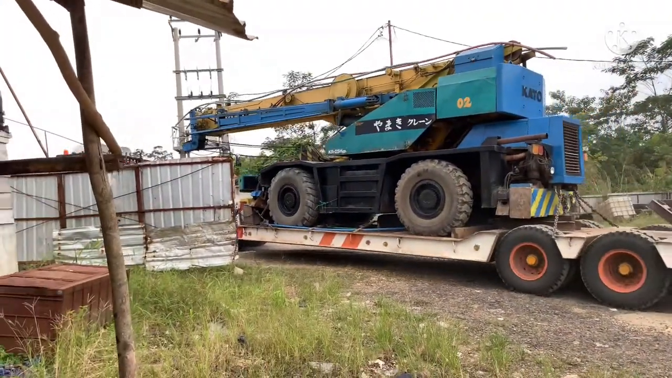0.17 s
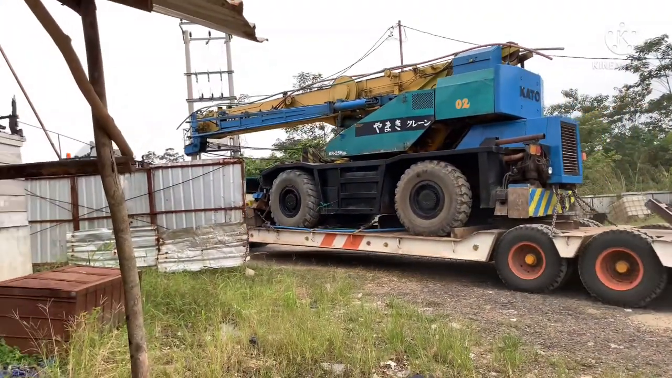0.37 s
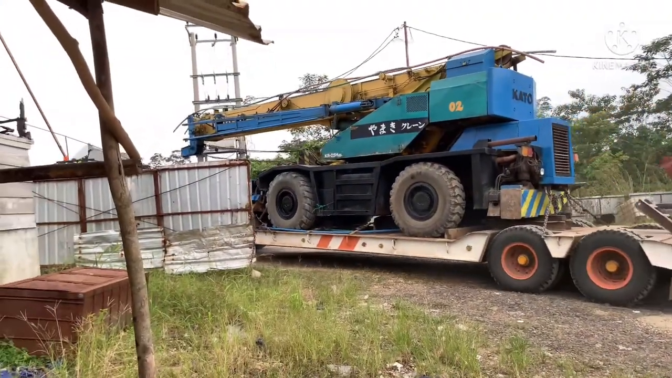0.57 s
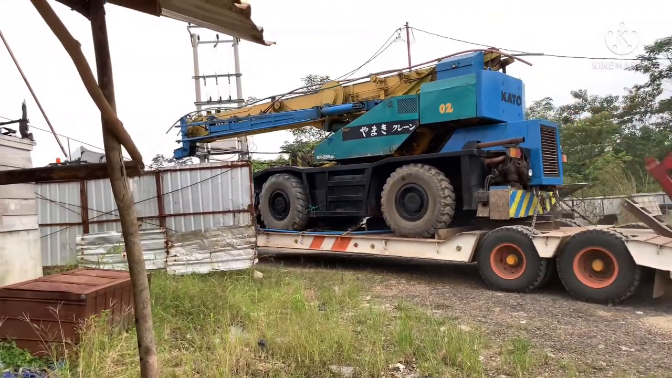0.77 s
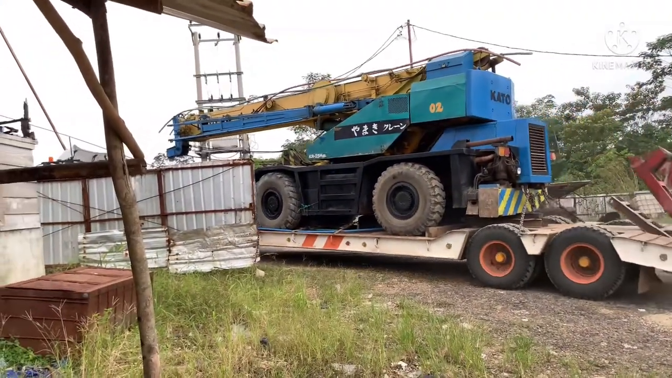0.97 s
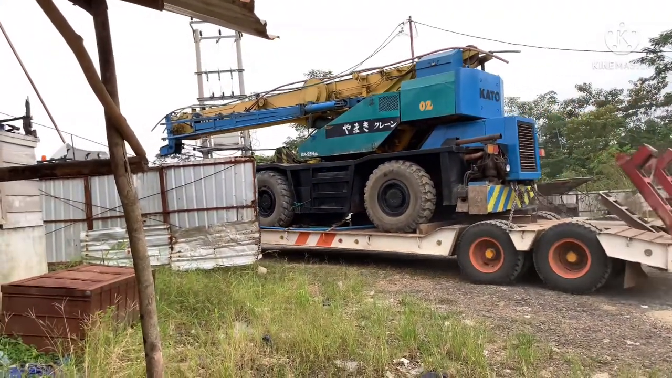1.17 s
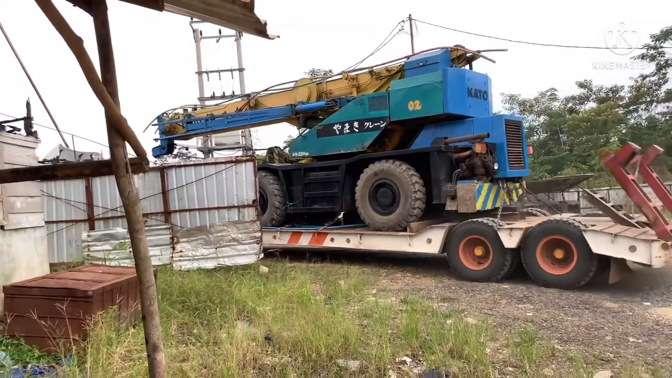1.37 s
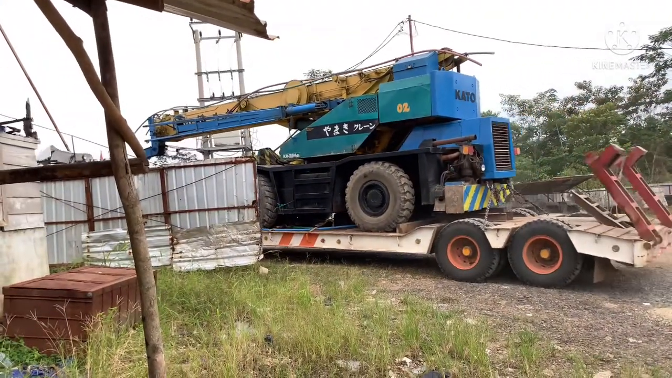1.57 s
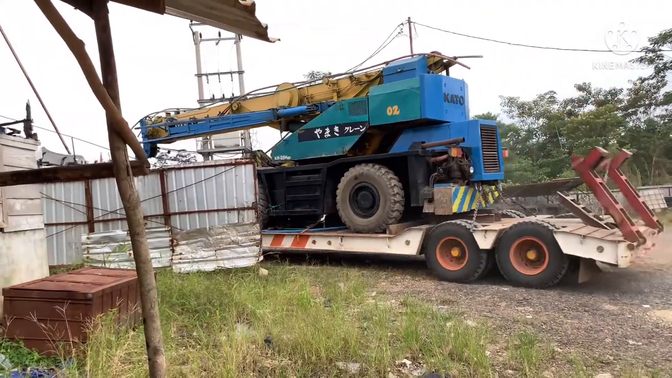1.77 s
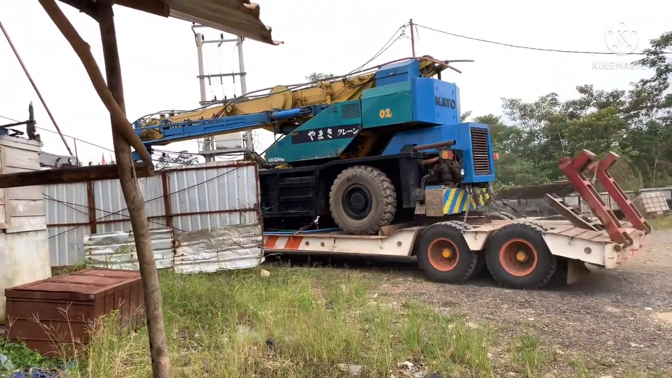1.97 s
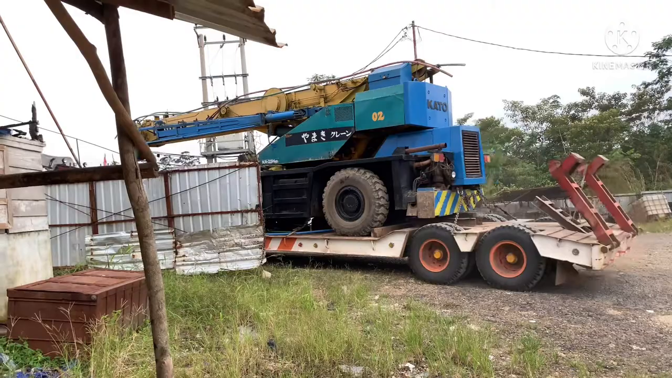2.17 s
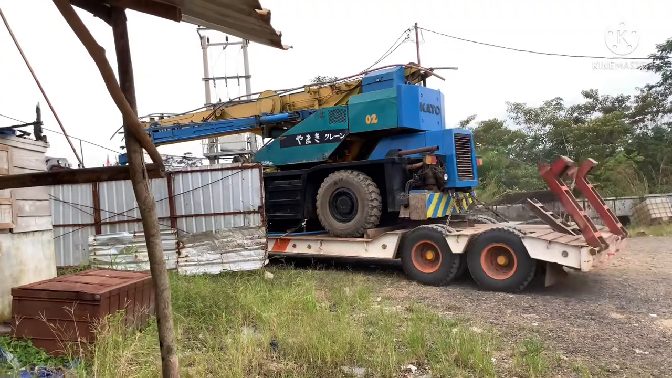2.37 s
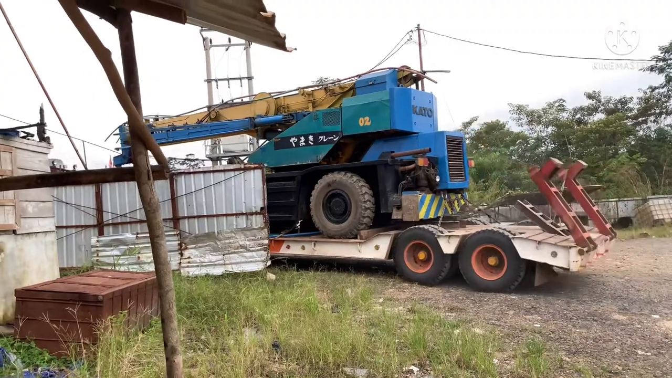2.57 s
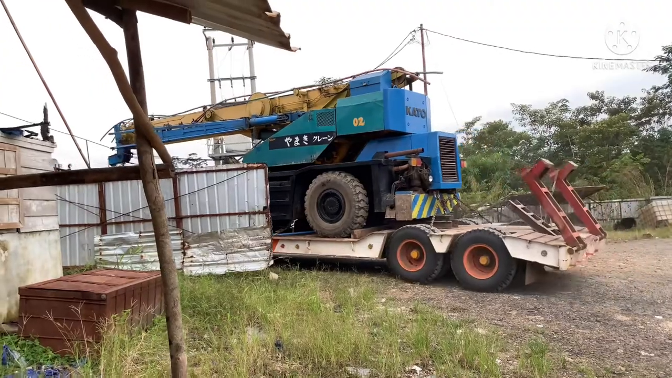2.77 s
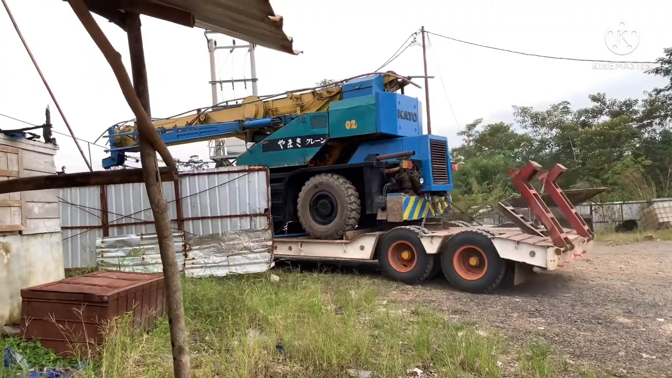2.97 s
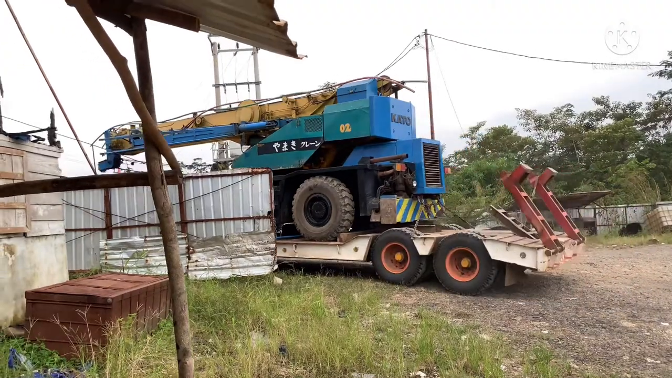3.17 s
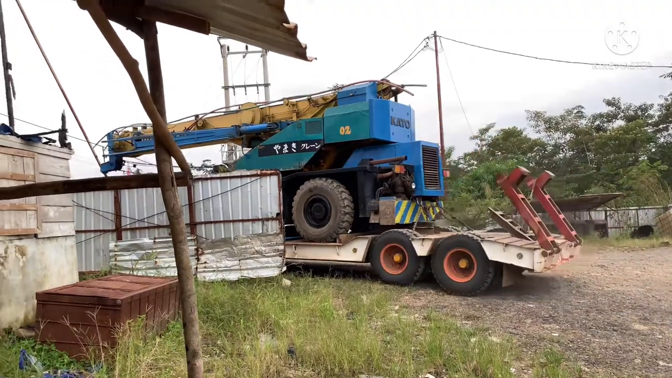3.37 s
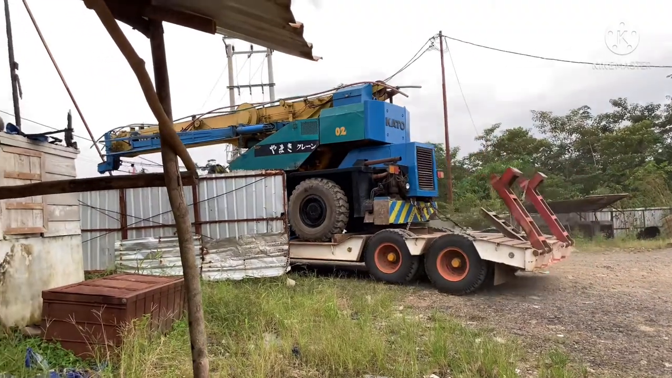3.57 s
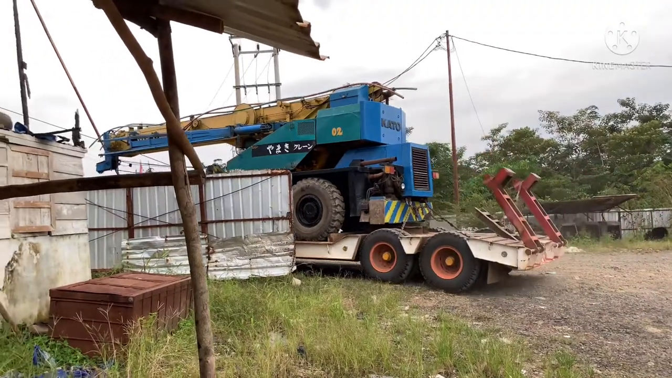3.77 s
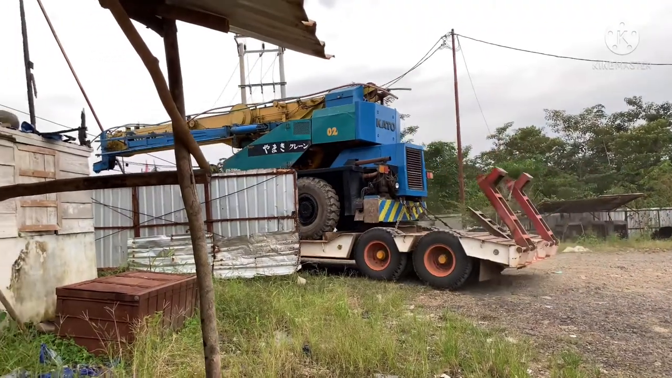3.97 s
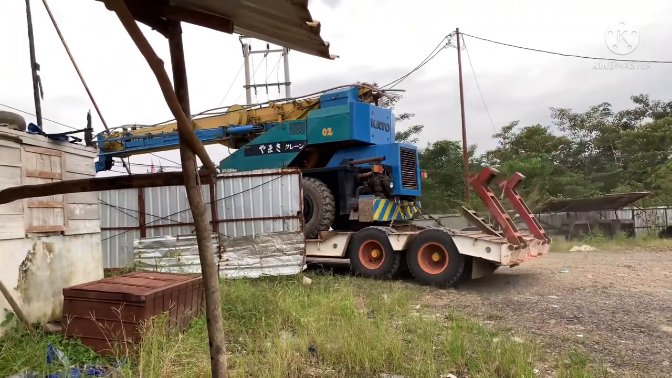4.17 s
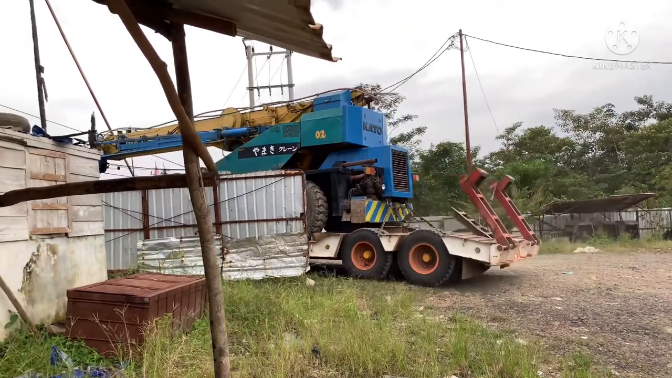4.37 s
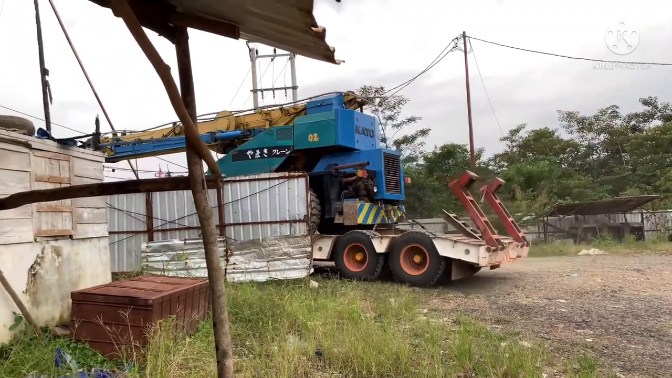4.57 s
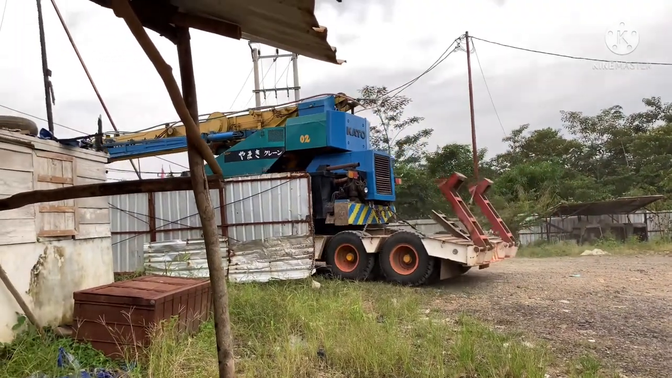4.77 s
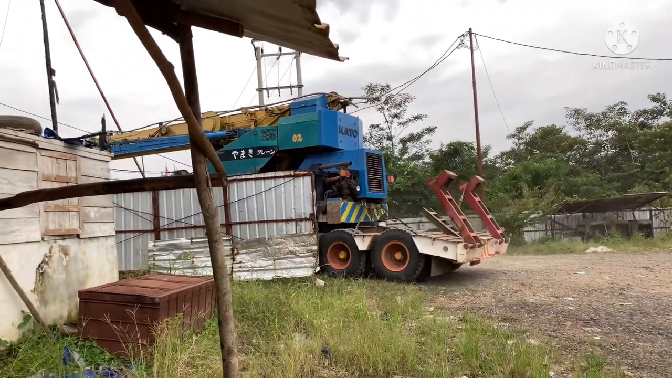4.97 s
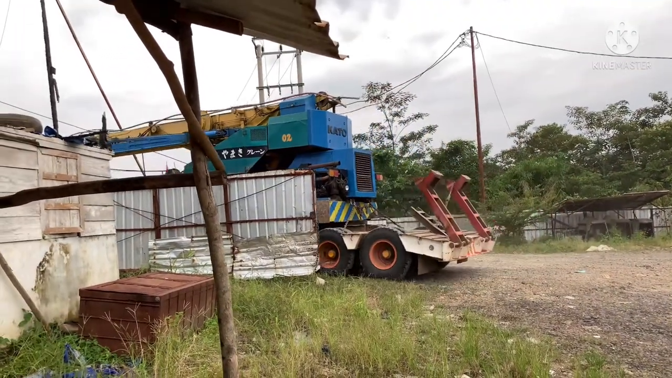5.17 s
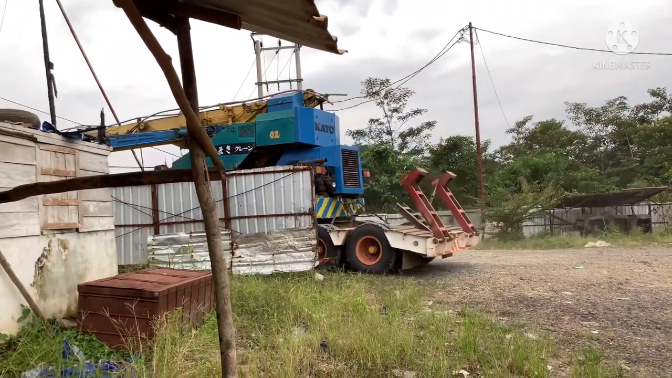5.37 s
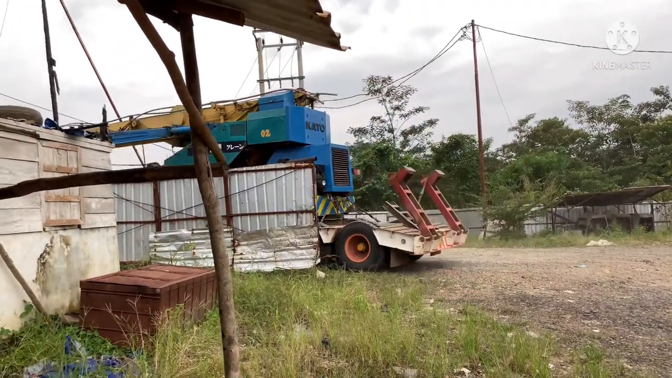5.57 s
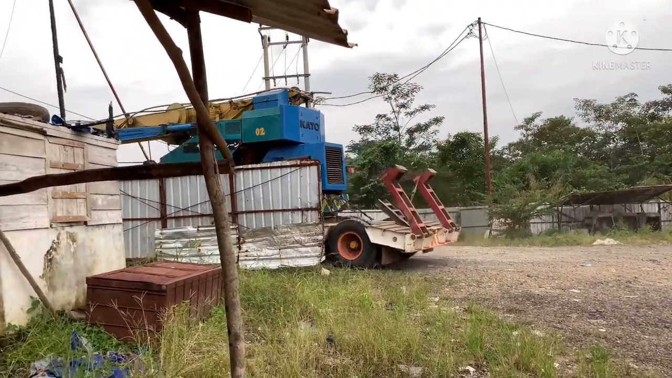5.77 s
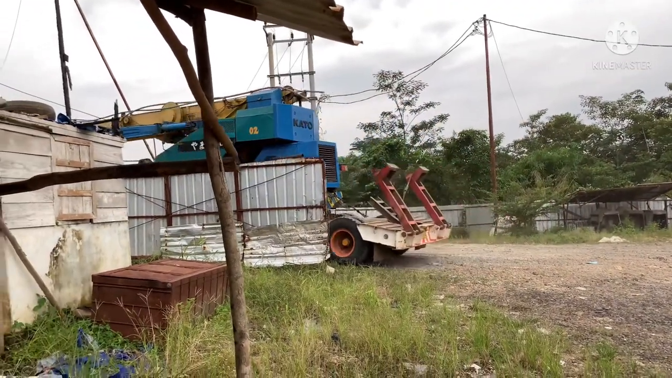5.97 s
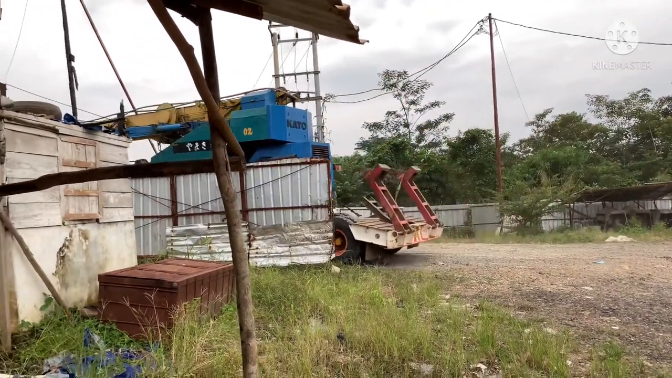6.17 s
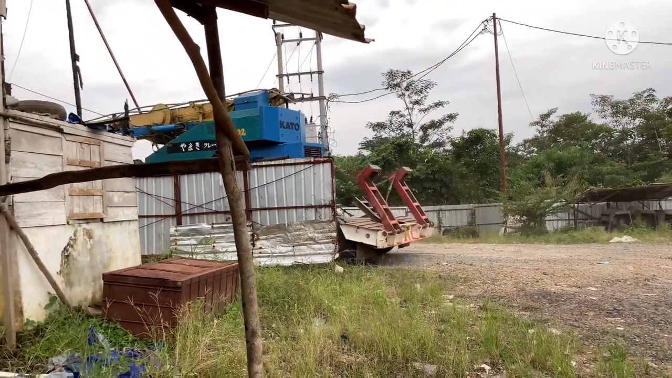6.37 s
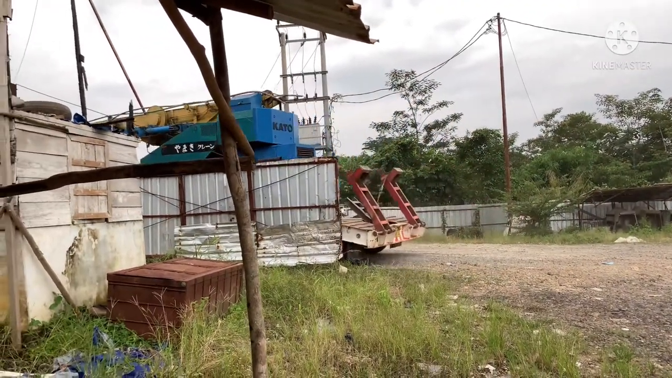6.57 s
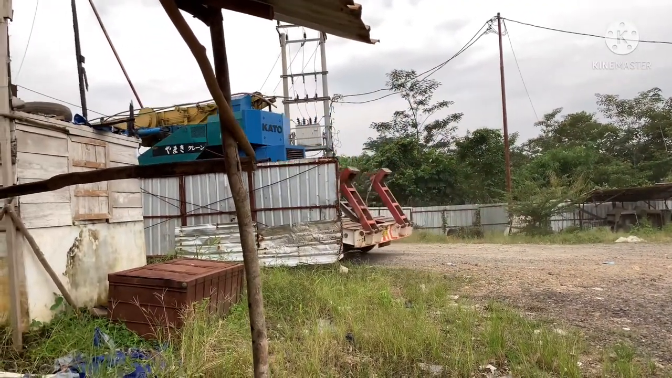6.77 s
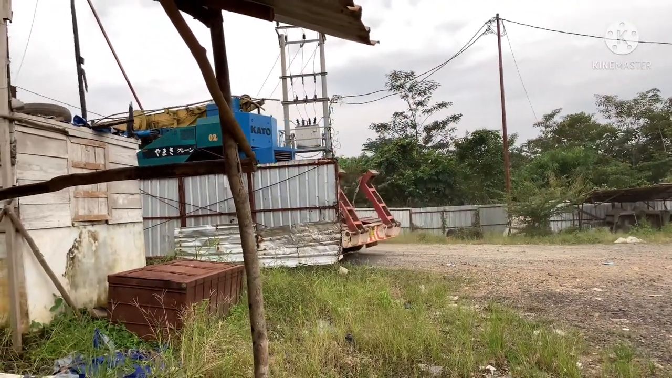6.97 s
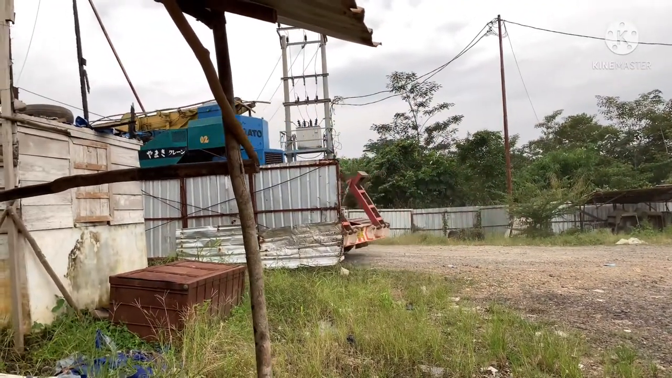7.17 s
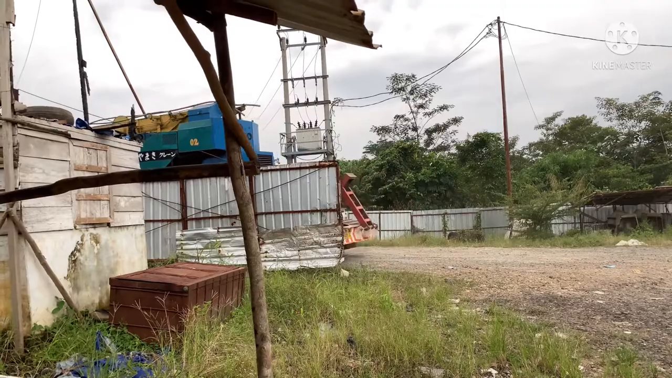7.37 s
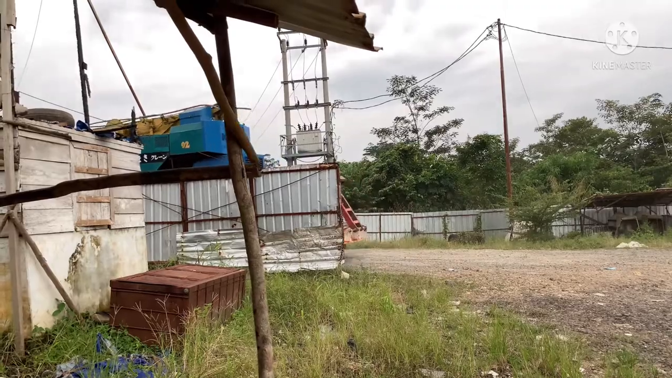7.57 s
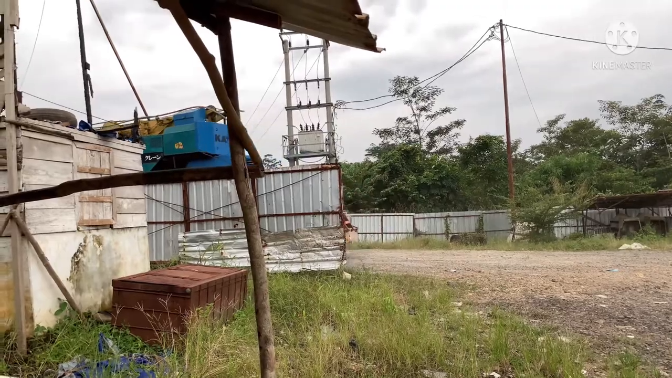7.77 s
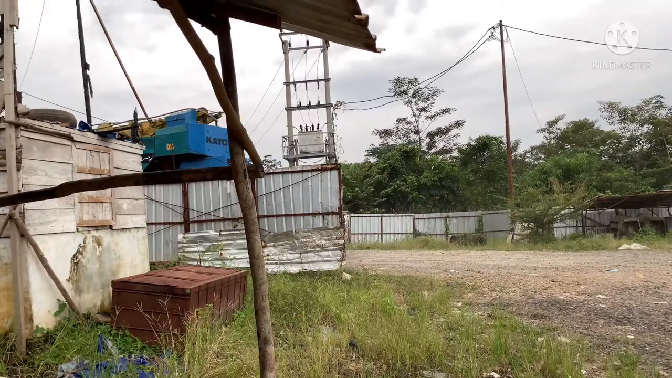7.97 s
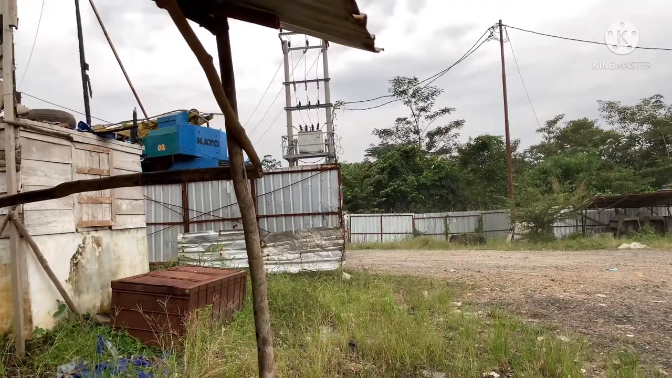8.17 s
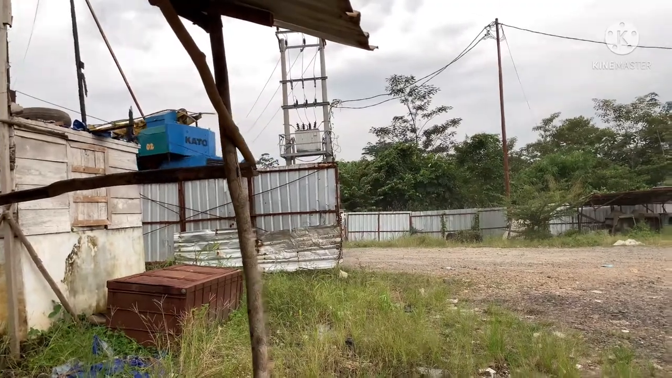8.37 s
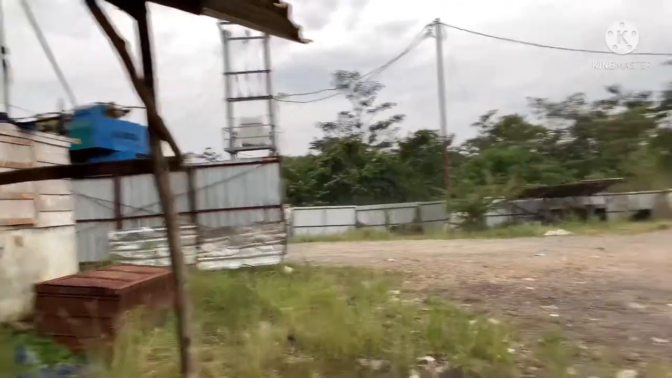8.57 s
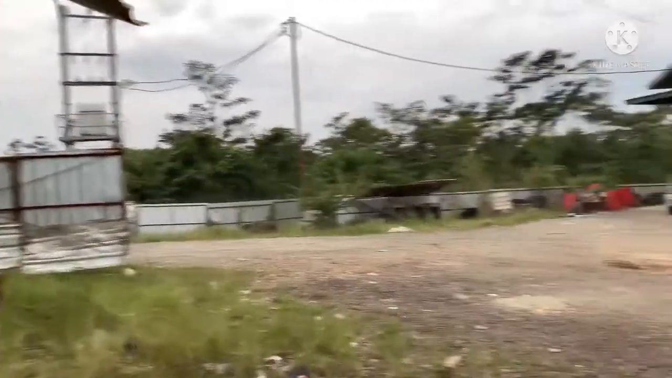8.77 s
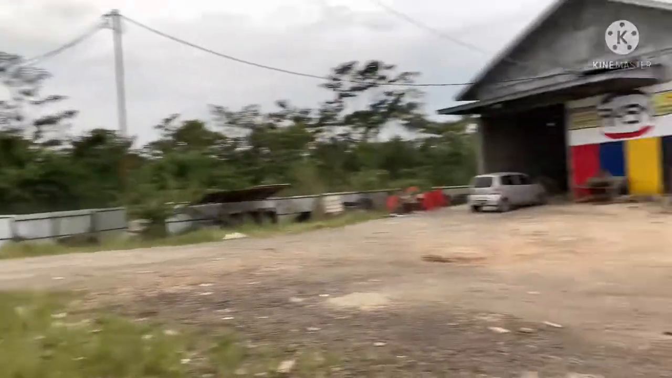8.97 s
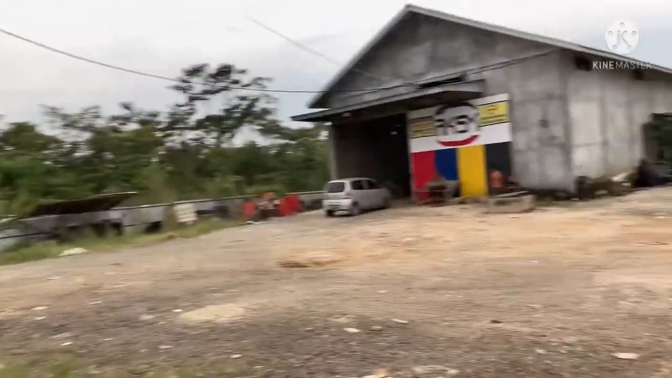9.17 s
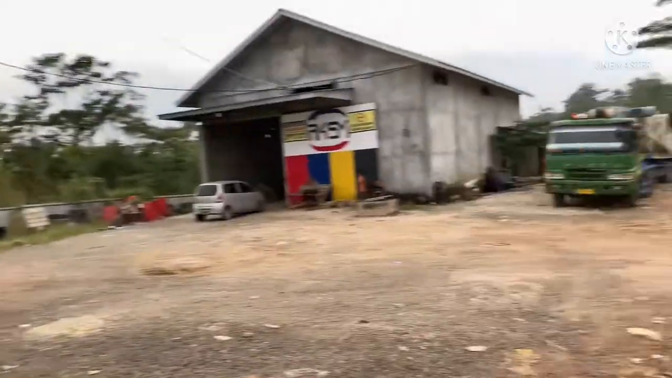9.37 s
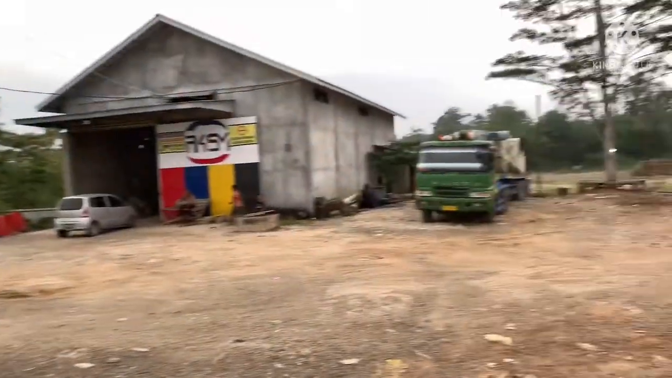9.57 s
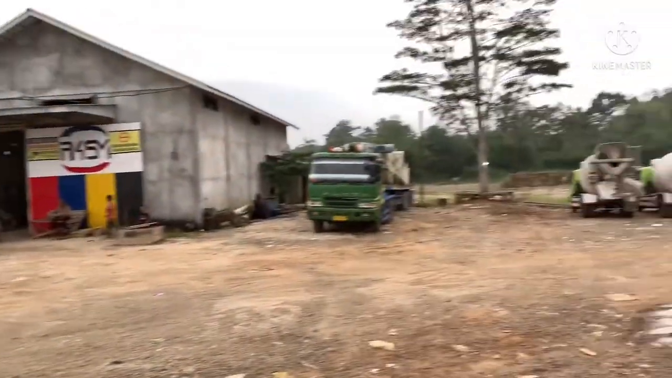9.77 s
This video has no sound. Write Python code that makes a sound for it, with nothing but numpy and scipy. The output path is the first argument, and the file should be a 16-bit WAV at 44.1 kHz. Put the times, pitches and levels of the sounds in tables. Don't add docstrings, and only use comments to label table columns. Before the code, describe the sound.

A handheld stereo phone in an open gravel yard hears a heavy diesel truck close by, pulling a loaded low trailer. From 0 s a low, uneven firing drone, tailpipe roar, block and valve clatter, fan hiss, loose chain rattle and rolling tyre rumble are at their loudest. Link strikes and clanks come at 0-0.2 s, frame jolts at 0.5 and 1.1-1.3, and the hardest deep thud with rebounds at 1.9-2.0. The engine pitch sags until about 2.5, then climbs to 7 as clanks and dry stone ticks continue sparsely. From 4.8 the truck turns a corner and steadily fades, its drone dipping at moments. A faint bump falls at 6.0; a short stick-slip groan with echo at 7.3. Behind the fence it grows distant. Near 8.9 the phone swings, bringing a slight whistle, then a faint parked truck's throb and whine with tiny clanks until 9.8.

```python
import sys
import numpy as np
from scipy import signal
from scipy.fft import rfft, irfft, next_fast_len
from scipy.io import wavfile
from scipy.ndimage import uniform_filter1d, map_coordinates

SR = 44100
rng = np.random.default_rng(int(sys.argv[2]) if len(sys.argv) > 2 else 0)


def pcm_store(signal):
    levels = np.round(np.clip(np.atleast_2d(signal), -1, 1) * 32767)
    wavfile.write(sys.argv[1], SR, levels.astype(np.int16).T)


def convert_level_to_amplitude(level_db):
    exponent = np.asarray(level_db, float) / 20
    return 10 ** exponent


N = 433062
COMMON = np.array([[1], [0]])


def unit(x):
    return x / np.sqrt(np.mean(x ** 2) + 1e-20)


def peak(x):
    return x / np.abs(x).max()


def along(points, hz):
    f, v = np.transpose(points)
    return np.interp(np.log(hz + 1), np.log(f + 1), v)


def curves(rows):
    s, *cols = np.transpose(rows)
    return [np.interp(np.arange(N) / SR, s, c) for c in cols]


def wobble(rate):
    knots = rng.standard_normal(int(N * rate / SR) + 4)
    return map_coordinates(knots, [np.arange(N) * rate / SR])


def step(s, takes_s):
    return .5 + .5 * np.tanh((np.arange(N) / SR - s) / takes_s)


def swell(s, takes_s):
    return np.exp(-((np.arange(N) / SR - s) / takes_s) ** 2)


def filtered(x, response):
    m = next_fast_len(N + SR // 4)
    return irfft(rfft(x, m) * response(np.fft.rfftfreq(m, 1 / SR)), m)[..., :N]


def resonant(modes):
    def response(f):
        total = 0
        for k, (centre, width, db) in enumerate(modes):
            damping = 1j * f * width
            total = total + (-1) ** k * convert_level_to_amplitude(db) * damping / (centre * centre - f * f + damping)
        return total
    return response


def resonated(x, modes):
    return unit(filtered(filtered(x, resonant(modes)), resonant(modes)))


def rings(modes):
    return resonated(rng.standard_normal((2, N)), modes)


def plain(spectrum):
    return unit(filtered(rng.standard_normal((2, N)), lambda hz: convert_level_to_amplitude(along(spectrum, hz))))


def rush(spectrum, patchy_db, streak_db=1.0, gate=1):
    pair = gate * rng.standard_normal((2, N))
    for length, high, long, depth_db in ((512, 5, 8, patchy_db), (2048, 2, 10, streak_db)):
        z = signal.stft(pair, nperseg=length)[2]
        field = uniform_filter1d(rng.standard_normal(z.shape[1:]), size=high, axis=0)
        field = uniform_filter1d(field, size=long, axis=1)
        pair = signal.istft(z * convert_level_to_amplitude(depth_db * unit(field)), nperseg=length)[1][:, :N]
    return unit(filtered(pair, lambda hz: convert_level_to_amplitude(along(spectrum, hz))))


def add(out, s, sound):
    start = round(s * SR)
    out[..., start:start + sound.shape[-1]] += sound


# time in seconds, gain in dB.
DISTANCE = [(0, 1.5), (.45, -0.5), (1.5, -2), (2.2, -2.5), (2.57, -1), (3.0, -2.5), (4.1, -3), (5, -5),
            (5.6, -6.5), (6.12, -5.5), (6.4, -7), (7, -9), (7.7, -10), (8.3, -11.5), (9.82, -12.5)]
# near level in dB, share of the distance loss,
# change at the corner in dB, change behind the fence in dB, change as the phone swings in dB.
LAYERS = [(-29, 0.48, 0.3, -1.5, -5), (-31, 1.038, 0.1, -1.5, -1), (-40.5, 1.215, -0.3, 3.5, 2.5),
          (-51, 1.57, -0.2, -4.5, 2.5), (-37, 0.67, -2, 3, -3)]
CORNER_S, CORNER_TAKES_S = 4.8, 0.09
FENCE_S, FENCE_TAKES_S = 7.13, 0.5
SWING_S, SWING_TAKES_S = 8.93, 0.2


def heard():
    causes = [curves(DISTANCE)[0], step(CORNER_S, CORNER_TAKES_S),
              step(FENCE_S, FENCE_TAKES_S), step(SWING_S, SWING_TAKES_S)]
    return [near_db + np.dot(effects, causes) for near_db, *effects in LAYERS]


# frequency in Hz, density in dB per Hz.
YARD = [(20, -40), (36, -19), (50, 2), (58, 11), (70, -40), (90, -120)]


def yard():
    return convert_level_to_amplitude(-47.5) * plain(YARD)


IDLE_FROM_S, THROB_DB = 7.4, -49
WHINE_DB, WHINE_AHEAD_DB = -57.5, 13.5
WHISTLE_S, WHISTLE_TAKES_S, WHISTLE_DB, WHISTLE_SWELL_DB = 8.82, 0.39, -67.5, 15


def parked():
    t = np.arange(N) / SR
    fade = np.clip(t - IDLE_FROM_S, 0, 1) ** 2
    throb = np.sqrt(2) * np.sin(2 * np.pi * 60.5 * t + 0.75 * wobble(2.7)) * COMMON
    whine = rings([(475.6, 120, -0.52), (1200, 104, -0.3), (1336, 43, 1.7), (1450, 54, -1)])
    whistle = rings([(2356, 137, 0.99), (2530, 160, -1), (2730, 230, -2)])
    whine_db = WHINE_DB + WHINE_AHEAD_DB * step(SWING_S + .12, SWING_TAKES_S)
    whistle_db = WHISTLE_DB + WHISTLE_SWELL_DB * swell(WHISTLE_S, WHISTLE_TAKES_S)
    return fade * (convert_level_to_amplitude(whine_db) * whine + convert_level_to_amplitude(THROB_DB) * throb + convert_level_to_amplitude(whistle_db) * whistle)


# frequency in Hz, density in dB per Hz.
TYRES = [(20, -50), (40, -29), (52, -9), (80, -6.5), (130, -3), (165, -8), (220, -66), (300, -120)]


def tyres():
    return convert_level_to_amplitude(heard()[4] + 6.0 + 0.51 * wobble(1.385)) * plain(TYRES)


# start in seconds, peak in dB, centre in Hz.
TICKS = [(0.3292, -34, 11400), (0.423, -34, 10700), (1.7625, -32, 9600), (2.785, -35, 10240),
         (2.81, -24, 15000), (3.4406, -32, 11200), (4.6941, -39, 11300), (5.369, -33, 11300),
         (5.8384, -44, 11000), (5.863, -39, 10200), (5.8715, -39, 10230), (5.9, -35, 11000),
         (5.9044, -41, 10500), (5.9267, -38, 11300), (6.6427, -46, 14650), (6.766, -47, 10350)]
TICK_T60_S = .0055


def stones():
    out, t = np.zeros((2, N + SR)), np.arange(SR // 4) / SR
    for s, db, hz in TICKS:
        noise = rng.standard_normal((2, len(t))) * [[1], [.3]]
        grit = signal.lfilter(*signal.iirpeak(hz, 1.5, SR), noise)
        add(out, s + 0.0014, convert_level_to_amplitude(db + 5.5) * peak(convert_level_to_amplitude(-60 * t / TICK_T60_S) * grit))
    return out[:, :N]


# start in seconds, peak in dB, ring in Hz.
BUMPS = [
    (0.48, -15, 463),
    (1.13, -17, 226),
    (1.249, -15.5, 207),
    (1.298, -14, 167.3),
    (1.942, -8.5, 129),
    (1.945, -18, 330),
    (1.971, -13.5, 132),
    (2.02, -15, 169.5),
    (5.979, -17.5, 251.9),
    (6.049, -22, 260),
]
# start in seconds, peak in dB, ring in Hz.
CLANKS = [(0.0184, -17.5, 2360), (0.094, -22, 2300), (0.179, -20.5, 2630), (1.0184, -23, 2380),
          (1.331, -25, 2340), (1.9381, -20.5, 2150), (1.965, -24, 2250), (1.98, -31, 2300),
          (2.3445, -17.5, 1590), (2.4684, -26, 2350), (2.578, -20.5, 1541), (2.586, -20, 2317),
          (2.562, -27, 3000), (2.5994, -23, 3200), (3.1557, -23, 1570), (3.9052, -25, 1710),
          (5.369, -21.5, 797), (6.8237, -34, 2325), (8.8995, -34, 2399), (9.3488, -31, 1567),
          (9.3621, -33, 1620), (9.3721, -29, 1670)]
# start in seconds, peak in dB, ring in Hz, 60 dB decay in seconds.
SURGES = [(.5, -21, 162, .35), (9.74, -41, 1340, .4), (2.3, -22, 209.5, .4), (2.95, -21.5, 684, .2),
          (3.1, -23.5, 650, .3), (5.12, -28.5, 380, 0.44), (5.22, -25, 601, .2), (6.2, -28, 350, 0.28),
          (7.515, -30, 740, 0.096), (8.55, -31, 515, 0.24), (8.62, -33, 674, 0.26), (9.68, -40, 1357, 0.37)]
# start in seconds, ring in Hz, peak in dB, 60 dB decay in seconds.
PINGS = [
    (2.8115, 14900, -27, .008),
    (0.1907, 2550, -13.5, 0.01),
    (.1905, 3600, -15, 0.0058),
    (1.907, 700, -20, 0.019),
    (1.936, 4500, -35, 0.068),
    (2.586, 3940, -27, .02),
    (4.667, 910, -31, 0.015),
    (5.369, 4160, -33, 0.02),
    (5.369, 11600, -36, .012),
    (8.68, 2740, -34, .03),
]
BUMP_T60_S, CLANK_T60_S = .16, .03


def trailer():
    out, t = np.zeros((2, N + SR)), np.arange(SR // 4) / SR
    bumps = [(*row, BUMP_T60_S) for row in BUMPS]
    clanks = [(*row, CLANK_T60_S) for row in CLANKS]
    # rows, rise in s, sharpness (Q), gain in dB
    for rows, rise, sharp, gain_db in ((bumps, .006, 4, -1.5), (SURGES, .015, 5, 1.5), (clanks, .0015, 3, -2.5)):
        for s, db, hz, t60 in rows:
            ring = signal.lfilter(*signal.iirpeak(hz, sharp, SR), rng.standard_normal((2, len(t))))
            envelope = convert_level_to_amplitude(-60 * t / t60) * (1 - np.exp(-t / rise))
            add(out, s, convert_level_to_amplitude(db + gain_db) * peak(envelope * ring))
    for s, hz, db, t60 in PINGS:
        envelope = convert_level_to_amplitude(db - 60 * t / t60) * (1 - np.exp(-t / 0.00024))
        add(out[0], s, envelope * np.sin(2 * np.pi * hz * t))
    return out[:, :N]


def rattle(count, centre_hz, spread, cycles):
    draw, t = rng.random((count, 4)), np.arange(SR // 50) / SR
    hz = centre_hz * np.exp(spread * (2 * draw[:, 1:2] - 1))
    size = convert_level_to_amplitude(-2.5 * np.log(draw[:, 2:3] + .02)) * centre_hz / hz
    envelope = np.exp(-t * hz / cycles) * (1 - np.exp(-t * hz))
    hits = size * np.sin(2 * np.pi * hz * t) * envelope
    row_start = (N + SR) * (draw[:, 3:] > .5)
    where = (draw[:, :1] * N).astype(int) + np.arange(len(t)) + row_start
    return unit(np.bincount(where.ravel(), hits.ravel(), 2 * (N + SR)).reshape(2, -1)[:, :N])


# frequency in Hz, width in Hz, level in dB.
BEAM = [
    (234, 49, -0.5),
    (640, 146, -2.5),
    (836, 120, -2),
    (1060, 102, -6),
]
# frequency in Hz, width in Hz, level in dB.
OVERTONE = [
    (1326, 120, 2),
    (1590, 150, 0.5),
    (2200, 180, -8),
]
GROAN_S, ATTACK_S, HOLD_S, RELEASE_DB_PER_S = 7.274, .014, .115, 280
LOCK_S, LOCK_TAKES_S, LOCK_DB, CLEAR = 7.33, .01, 2.5, .58
GROAN_DB, OVERTONE_DB, OVERTONE_LOCK_DB, SCRAPE_DB = -28.5, -41, 4, -54
CHATTER_HZ, CHATTER = 216.6, 0.4


def groan():
    t, lock = np.arange(N) / SR - GROAN_S, step(LOCK_S, LOCK_TAKES_S)
    release = convert_level_to_amplitude(-RELEASE_DB_PER_S * np.clip(t - ATTACK_S - HOLD_S, 0, 1))
    shape = np.clip(t / ATTACK_S, 0, 1) ** 2 * release
    slips = np.diff(np.floor(CHATTER_HZ * (t + GROAN_S)), prepend=0)
    chatter = slips * np.sqrt(SR / CHATTER_HZ) * COMMON
    friction = rng.standard_normal((2, N)) * convert_level_to_amplitude(1.1 * wobble(74))
    share = CHATTER * (1 - lock)
    force = share * chatter + (1 - share) * friction
    beam, over = resonated(force, BEAM), resonated(force, OVERTONE)
    phase = 2 * np.pi * 722 * t + 0.84 * wobble(40)
    tone = np.sqrt(2) * np.sin(phase) * convert_level_to_amplitude(1.8 * wobble(50))
    octave = np.sqrt(2) * np.sin(2 * phase) * convert_level_to_amplitude(1.8 * wobble(50))
    clear = CLEAR * lock
    low = convert_level_to_amplitude(GROAN_DB + LOCK_DB * lock) * ((1 - clear) * beam + clear * tone)
    high = convert_level_to_amplitude(OVERTONE_DB + OVERTONE_LOCK_DB * lock) * ((1 - clear) * over + clear * octave)
    near = shape * (low + high)
    echo = convert_level_to_amplitude(-16) * np.roll(near, round(.175 * SR), axis=1) + convert_level_to_amplitude(-10) * np.roll(near, round(.07 * SR), axis=1)
    scrape = convert_level_to_amplitude(SCRAPE_DB + 0.5) * plain(HISS) + convert_level_to_amplitude(SCRAPE_DB + 4) * plain(CLATTER)
    return near + echo + shape * scrape


# frequency in Hz, density in dB per Hz.
HISS = [(7200, -45), (7900, -2), (9500, -3.5), (11500, -8.5), (13500, -8.5), (15300, -12), (15750, -11),
        (15900, -120)]


def fan(level_db):
    unsteady = convert_level_to_amplitude(0.27 * wobble(12) + 0.47 * wobble(90))
    return convert_level_to_amplitude(level_db + 5.0) * rush(HISS, patchy_db=2.0, gate=unsteady)


# frequency in Hz, density in dB per Hz.
CLATTER = [(1600, -21), (1900, -3.5), (2400, -3), (2800, -7.5), (3200, -10.5), (4700, -10), (5500, -13),
           (6500, -13), (7600, -12.5), (8200, -19), (9000, -120)]


def valves(level_db, beat):
    knocks = convert_level_to_amplitude(0.5 * beat + 0.37 * wobble(150) + 0.68 * wobble(10))
    return convert_level_to_amplitude(level_db + 0.5) * rush(CLATTER, patchy_db=1.1, streak_db=2.0, gate=knocks)


# frequency in Hz, density in dB per Hz.
BLOCK = [(280, -2), (480, -4), (574, -4), (633, -2.5), (810, -2), (1230, -8), (1440, -7.5), (1900, -13.5),
         (2470, -69), (4180, -120)]
# frequency in Hz, width in Hz, level in dB.
PANELS = [
    (644.2, 33, -1.5),
    (795.6, 74, -2),
    (883, 34, -2.5),
    (1317, 49, -4.5),
    (1502, 26, -5),
    (2340, 56, -6),
    (2490, 28, -27),
]


def block(level_db, beat):
    shake = convert_level_to_amplitude(0.94 * beat + 0.27 * wobble(30))
    body = convert_level_to_amplitude(level_db + 1.55) * rush(BLOCK, patchy_db=1.0, streak_db=2.5, gate=shake)
    return body + convert_level_to_amplitude(level_db - 9.0) * rings(PANELS)


# frequency in Hz, density in dB per Hz.
PIPE = [(110, -50), (150, 0), (240, -0.5), (370, -2.5), (445, -10.5), (520, -21), (680, -40), (1100, -120)]
CYLINDERS = [0, -8, -2, -12, -1, -6]


def pipe(level_db, turns):
    fired = np.flatnonzero(np.diff(np.floor(turns)))
    pulses = np.zeros(N)
    pulses[fired] = convert_level_to_amplitude(np.resize(CYLINDERS, len(fired)) + 1.67 * rng.standard_normal(len(fired)))
    pulses[fired] -= .8 * pulses[fired].mean()

    def response(hz):
        return convert_level_to_amplitude(along(PIPE, hz)) + convert_level_to_amplitude(along(TYRES, hz) + 4.5) + convert_level_to_amplitude(along(BLOCK, hz) - 23)

    puffs = unit(filtered(pulses, response))
    return convert_level_to_amplitude(level_db - 1.1) * (rush(PIPE, patchy_db=1.77) + convert_level_to_amplitude(-4.5) * puffs * COMMON)


# time in seconds, depth in dB, half length in seconds.
NULLS = [
    (3.92, 5, .05),
    (4.29, 0, 0.072),
    (4.758, 5, 0.14),
    (5.244, 12, 0.072),
    (5.458, 17, 0.076),
    (7.987, 6, 0.034),
    (8.55, 6, 0.12),
    (9.14, 5, 0.11),
]
SIXTHS = [9, 12, 15, 18, 16, 19]
# level before the corner in dB, level after in dB.
ORDERS = [(-34, -31.5), (-39.5, -27.5), (-50, -58), (-45.5, -60), (-48, -62), (-42, -65)]
LUGS = {16: (1.44, 0.43, 15), 18: (2.3, 0.6, 9.3), 9: (4.303, .6, 5), 12: (4.9, .3, 4)}
MUFFLER_HZ, MUFFLER_WIDTH_HZ, MUFFLER_DB = 165, 10.2, 8
ORDER_LOSS, ORDER_SWING_DB = 1.233, -3.5


def exhaust(rate, firing_db):
    corner, levels = step(CORNER_S, CORNER_TAKES_S), []
    travel_db = ORDER_LOSS * curves(DISTANCE)[0] + ORDER_SWING_DB * step(SWING_S - .3, SWING_TAKES_S)
    for sixths, (before, after) in zip(SIXTHS, ORDERS):
        s, half, lug_db = LUGS.get(sixths, (0, 1, 0))
        detune = (sixths * rate / 6 - MUFFLER_HZ) / MUFFLER_WIDTH_HZ
        muffler_db = MUFFLER_DB / (1 + detune ** 2)
        levels.append(before + (after - before) * corner + travel_db + muffler_db + lug_db * swell(s, half))
    firing_db = firing_db - sum(db * swell(s, half) for s, db, half in NULLS)
    return [1, *np.array(SIXTHS) / 6], [firing_db, *levels]


def drone(rate, firing_db, turns):
    total = np.zeros(N)
    for k, db in zip(*exhaust(rate, firing_db)):
        level = convert_level_to_amplitude(db + 0.57 * np.sqrt(k) * wobble(9))
        total += np.sqrt(2) * level * np.sin(2 * np.pi * k * turns + 0.13 * k * wobble(5))
    return total * COMMON


# time in seconds, firing rate in Hz, firing tone in dB.
ENGINE = [(0, 63.9, -28), (.3, 63.9, -29), (.98, 61.7, -26.5), (1.4, 59.5, -28.5), (2.08, 56.87, -24),
          (2.45, 56.62, -23), (2.75, 57.77, -22), (3.3, 62.8, -24), (3.62, 65.07, -26), (4.17, 69.7, -28),
          (5.06, 73.03, -26), (5.7, 74.1, -24.5), (6.84, 75, -27), (7.44, 75.2, -25.5), (8.1, 72.02, -28.5),
          (8.7, 70.98, -35), (9.38, 70.7, -28.5), (9.82, 70.5, -33.5)]


def truck():
    rate, firing_db = curves(ENGINE)
    turns = np.cumsum(rate) / SR
    beat = np.cos(2 * np.pi * turns)
    pipe_db, block_db, valves_db, fan_db, _ = heard()
    chains = convert_level_to_amplitude(valves_db - 6.0) * rattle(count=1800, centre_hz=3021, spread=.7, cycles=51)
    engine = drone(rate, firing_db, turns) + pipe(pipe_db, turns) + block(block_db, beat)
    return engine + valves(valves_db, beat) + fan(fan_db) + chains


def scene():
    return yard() + parked() + tyres() + stones() + trailer() + groan() + truck()


def top_cut(x):
    return signal.sosfilt(signal.butter(12, 17080, fs=SR, output="sos"), x)


# frequency in Hz, left-right coherence from 0 to 1.
ALIKE = [(60, .97), (300, .95), (550, .78), (900, .65), (1300, .2), (1600, .15), (1900, .5), (3100, .48),
         (3600, .17), (5800, .2), (6500, .65), (7100, .5), (7800, .8), (8100, .92), (17000, .93)]
# frequency in Hz, lead of the left in radians.
LEAD = [(0, 0), (1050, .1), (1300, 2), (1900, 3.9), (2240, 6.3), (3100, 8.8), (3700, 11.6), (4400, 12.6),
        (5500, 15.7), (6300, 18.4), (6700, 18.6), (7900, 16.2), (8900, 15.4), (10400, 13), (11600, 12.3),
        (12600, 9.9), (14300, 9.1), (15200, 6.4), (17000, 6.28)]
# frequency in Hz, left minus right in dB.
TILT = [(60, 2.4), (700, 2.6), (1300, 2.6), (2200, 0), (3500, -1), (5400, -3), (6500, -1), (7500, 0),
        (17000, 0)]


def record(dry):
    def spread(hz):
        angle = np.arccos(np.clip(along(ALIKE, hz), 0, 1)) / 2
        return np.array([np.cos(angle), np.sin(angle)])

    def split(hz):
        half = convert_level_to_amplitude(along(TILT, hz) / 2) * np.exp(.5j * np.interp(hz, *np.transpose(LEAD)))
        return np.array([half, 1 / half]) * (hz < 15880)

    mid, side = filtered(dry, spread)
    ports = filtered(np.array([mid + side, mid - side]), split)
    return top_cut(ports)


dry = scene()
out = record(dry)
pcm_store(out)
```